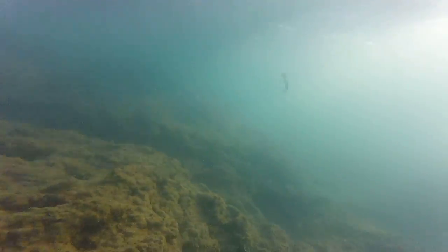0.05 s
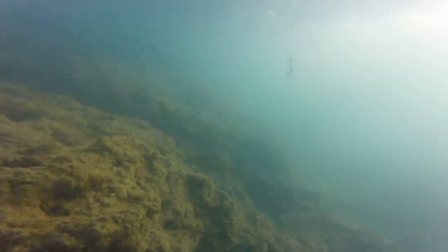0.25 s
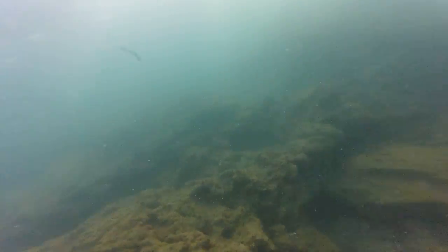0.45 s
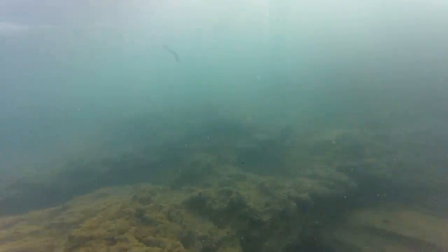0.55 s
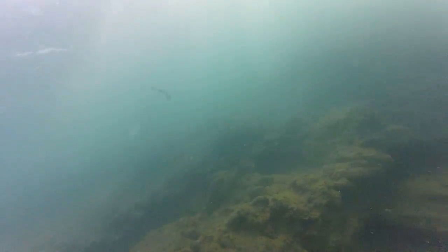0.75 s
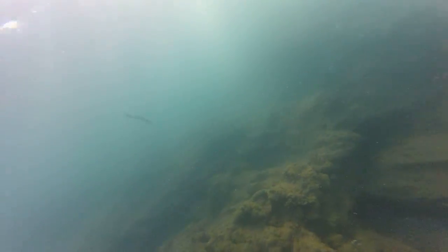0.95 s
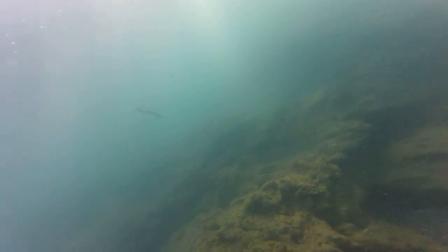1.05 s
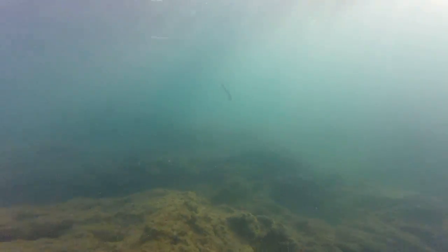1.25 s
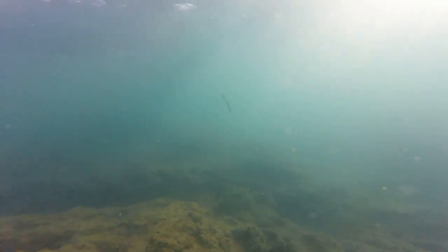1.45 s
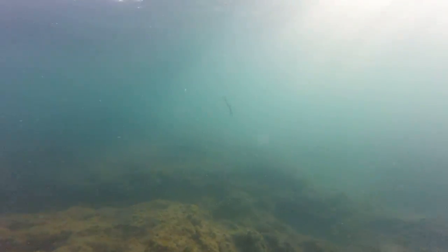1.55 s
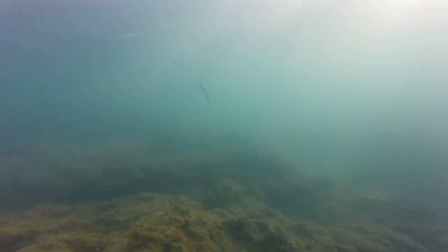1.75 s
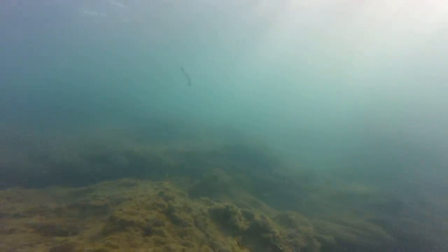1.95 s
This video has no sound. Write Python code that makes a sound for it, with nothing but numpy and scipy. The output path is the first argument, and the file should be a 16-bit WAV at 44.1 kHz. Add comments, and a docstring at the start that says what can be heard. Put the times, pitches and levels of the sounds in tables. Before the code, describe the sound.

Muffled water sways and churns, heard from inside a waterproof camera case near a rocky seabed. The case is knocked and scraped loudly, then bumped more softly and rubbed once, while faint snaps click over a dull hiss.

```python
"""Water hisses dully, sways and churns against a waterproof camera case carried over shallow rocks.
Tiny sharp snaps sound throughout. The case is bumped and scraped in one loud cluster, then more
gently: hard contacts crack and ring its wall modes, soft blows thump the shell.
Water swishes past three times; a grip rubs the case once, in uneven slips."""
import sys
import numpy as np
from scipy import signal
from scipy.fft import rfft, irfft, next_fast_len
from scipy.io import wavfile
from scipy.ndimage import map_coordinates

SR = 44100
rng = np.random.default_rng(int(sys.argv[2]) if len(sys.argv) > 2 else 0)


def master(y):
    """Save y as 16-bit WAV."""
    cut = np.clip(np.atleast_2d(y).T, -1, 1)
    pcm = np.round(cut * 32767)  # scale
    wavfile.write(sys.argv[1], SR, pcm.astype(np.int16))


N = 88200

# Hiss envelope, dipping after the loud bump (time [s], level [dB])
HISS_ENVELOPE = [(0, -47.5), (.38, -49), (.45, -54), (.62, -56.5), (.8, -50.5), (1.05, -50.5),
                 (1.35, -48.5), (2, -50)]
# Hiss spectrum (frequency [Hz], relative level [dB])
HISS_SPECTRUM = [(100, 6.5), (400, -2), (700, -7), (1030, 3.5), (1280, -4.5), (1650, -1.5), (2200, -2.5),
                 (3150, 0), (3650, -11.5), (4200, -5.5), (4800, -20), (6300, -22.5), (8200, -21),
                 (10000, -31), (12500, -32), (14000, -49), (16000, -61)]
# Slow water motion (frequency [Hz], relative level [dB])
SWAY_SPECTRUM = [(8, -33.5), (18, 1), (27, -1.5), (34, 1), (50, -26.5), (90, -25.5), (200, -74),
                 (1000, -140)]
# Turbulence along the case (time [s], relative level [dB])
CHURN_ENVELOPE = [(0, -38.5), (.13, -52.5), (.165, -38), (.24, -53.5), (.35, -51), (.39, -28.5), (.42, -15),
                  (.47, -18), (.51, -26.5), (.55, -15.5), (.58, -40.5), (.66, -41.5), (.73, -41),
                  (.83, -19), (.9, -38), (.98, -43.5), (1.06, -33), (1.12, -32.5), (1.27, -35),
                  (1.34, -45.5), (1.45, -37), (1.56, -43.5), (1.63, -53), (1.88, -60), (2, -53)]
# Turbulence spectrum (frequency [Hz], relative level [dB])
CHURN_SPECTRUM = [(25, 1.5), (55, 2.5), (105, 5.5), (160, -7.5), (280, -10), (420, -13.5), (600, -24.5),
                  (900, -33), (2000, -71), (6000, -120)]
# Near snaps (time [s], relative treble level [dB], relative body level [dB])
NEAR_SNAPS = [(.2678, -48.5, -61), (.362, -61, -39.5), (.404, -38, -43), (.4095, -21, -40),
              (.4245, -43, -51), (.4309, -41, -29.5), (.4365, -43, -49), (.45, -39.5, -29),
              (.4715, -41, -25), (.481, -32, -48), (.4873, -32, -47), (.5445, -30, -26.5),
              (.5495, -30.5, -45), (.6674, -47.5, -45), (.7866, -43, -41), (.828, -41.5, -41),
              (.855, -45, -38), (.9048, -42.5, -39), (.9472, -47, -41.5), (1.1568, -48.5, -46),
              (1.2735, -52, -35), (1.2974, -39.5, -27), (1.3508, -51, -49), (1.433, -66, -40),
              (1.497, -57, -42.5), (1.5868, -60, -37.5), (1.5995, -39.5, -49), (1.722, -62, -47),
              (1.7389, -52, -39), (1.8921, -47, -49.5), (1.9106, -55, -39)]
# Snap treble (frequency [Hz], relative level [dB])
SNAP_TREBLE_SPECTRUM = [(500, -66), (3000, 1), (5400, -2.5), (6300, 2.5), (7300, -9.5), (8100, 0),
                        (8700, -12.5), (9300, -5.5), (10000, -14), (11700, -22.5), (14000, -28),
                        (16000, -43)]
# Snap body (frequency [Hz], relative level [dB])
SNAP_BODY_SPECTRUM = [(200, -56), (900, -51), (1500, -12), (1950, 3.5), (2600, -3), (3300, -1), (4200, -13),
                      (5200, -34), (9000, -56), (15000, -81)]
# Deep ringing after each shove (time [s], level [dB], pitch [Hz], T60 [s])
SHOVE_RINGS = [(.052, -21, 25.6, 0.55), (.219, -14, 28, 0.34), (.345, -14.5, 27.8, 0.52),
               (.406, -1, 34.1, 0.27), (.781, -17, 32.8, 0.22), (.868, -8, 22.27, 0.52),
               (1.257, -9.5, 24.6, 0.23), (1.427, -12.5, 25.3, 0.55)]
# Soft blows on the shell, plus the low tone under the grip rub at 1.017 s (time [s], level [dB], pitch [Hz],
# T60 [s])
SHELL_THUMPS = [(.196, -24, 159, 0.076), (.4025, -4, 101, 0.013), (.438, -6.5, 198, 0.041),
                (.449, -9.5, 333, 0.049), (.458, -9.5, 284, 0.018), (.469, -7.5, 369, 0.031),
                (.479, -14, 278, 0.085), (.5435, 2, 292, 0.025), (.676, -37, 550, 0.02),
                (.803, -23, 405, 0.059), (.816, -16.5, 104, 0.089), (.855, -27.5, 306, 0.056),
                (1.017, -21.5, 176.6, 0.13), (1.183, -29, 197, 0.053), (1.23, -21.5, 173, 0.066),
                (1.497, -30, 418, .035)]
# Hard contacts, relative levels (time [s], low modes [dB], high modes [dB], crack [dB])
CONTACTS = [(.4027, -8, -44, -24), (0.4061, -4.5, -29, -26), (0.416, -38, -32, -35), (0.421, -44, -43, -43),
            (0.4312, -28, -36, -36), (0.443, -31, -21, -33), (0.4469, -25, -20.5, -29),
            (0.4552, -22, -14, -24), (0.4699, -23, -4, -16.5), (0.476, -23, -22, -39),
            (0.484, -29, -26, -24.5), (.487, -20, -41, -23.5), (.4983, -18, -33, -24),
            (0.5118, -23, -30, -25), (.521, -20.5, -21.5, -30), (.5275, -21.5, -39, -40),
            (.533, -22, -41, -31), (0.5402, -24, -13.5, -17), (.5455, -19.5, -29, -29),
            (0.5511, -25, -33, -41), (.557, -27, -35.5, -46), (0.755, -36, -41.5, -39),
            (0.803, -35, -43, -56), (.8155, -32.5, -41, -48), (.821, -27.5, -50, -42),
            (.831, -26, -54, -49), (.854, -29.5, -47, -33), (.8745, -37.5, -58, -43.5)]
# Lower wall modes (frequency [Hz], relative level [dB])
LOW_WALL_MODES = [(1000, 0), (1150, -9)]
# Upper wall modes (frequency [Hz], relative level [dB])
HIGH_WALL_MODES = [(1620, -1.5), (1800, -14.5)]
# Contact crack (frequency [Hz], relative level [dB])
CRACK_SPECTRUM = [(100, 8), (600, 0), (1200, 5.5), (1900, 0), (2400, -1.5), (2700, -4), (3050, 0.5),
                  (3500, -24), (4000, -9), (4700, -33), (8000, -42), (15000, -59)]
# Water brushing past (centre time [s], 1/e half-width [s], level [dB])
SWISH_PASSES = [(0.462, 0.046, -32), (0.919, 0.041, -46.5), (1.258, .034, -41.5)]
# Swish spectrum (frequency [Hz], relative level [dB])
SWISH_SPECTRUM = [(300, -25), (700, -29), (1000, 7.5), (1250, -3), (1650, 7.5), (2300, -4), (3200, -9.5),
                  (4500, -29), (9000, -38), (15000, -79)]
# Shell response to a grip slip (frequency [Hz], relative gain [dB])
SHELL_RESPONSE = [(50, 5), (190, 1), (430, -1), (640, -18), (850, -32), (1080, -7), (1400, -23),
                  (1850, -33.5), (2200, -25), (3000, -44), (6000, -68), (14000, -100)]


def amp(db):
    """Decibels to gain."""
    return 10 ** (np.asarray(db) / 20)


def gain_at(spectrum, hz):
    """Gain from (Hz, dB) points on a log frequency axis."""
    points_hz, points_db = np.transpose(spectrum)
    return amp(np.interp(np.log(hz + 1), np.log(points_hz + 1), points_db))


def curve(points):
    """(s, value) points to one value per sample."""
    return np.interp(np.arange(N) / SR, *np.transpose(points))


def wobble(rate_hz):
    """Smooth random curve through Gaussian knots."""
    knots = rng.standard_normal(int(N * rate_hz / SR) + 4)
    return map_coordinates(knots, [np.arange(N) * rate_hz / SR])


def filtered(x, response):
    """Zero-phase filter with gain response(hz)."""
    size = next_fast_len(N + SR // 2)
    hz = np.fft.rfftfreq(size, 1 / SR)
    return irfft(rfft(x, size) * response(hz), size)[:N]


def noise(spectrum):
    """Coloured noise, rms 1."""
    x = filtered(rng.standard_normal(N), lambda hz: gain_at(spectrum, hz))
    return x / np.sqrt(np.mean(x ** 2) + 1e-20)


def minimum_phase(spectrum, size=4096):
    """Causal impulse response from the folded cepstrum."""
    hz = np.fft.rfftfreq(size, 1 / SR)
    cepstrum = irfft(np.log(gain_at(spectrum, hz)))
    cepstrum[1:size // 2] *= 2
    cepstrum[size // 2 + 1:] = 0
    return irfft(np.exp(rfft(cepstrum)))


def add(track, start_s, sound):
    """Mix in place."""
    part = track[max(round(start_s * SR), 0):][:len(sound)]
    part += sound[:len(part)]


def fade(t60_s, rise_s):
    """Soft rise, exponential decay."""
    t = np.arange(int(1.5 * t60_s * SR) + 2) / SR
    return amp(-60 * t / t60_s) * (1 - np.exp(-(t / rise_s) ** 2))


def bursts(hits, spectrum, t60_s, rise_s):
    """One decaying noise burst per (s, dB)."""
    envelope = np.zeros(N)
    for start_s, db in hits:
        add(envelope, start_s, amp(db) * fade(t60_s, rise_s))
    return envelope * noise(spectrum)


def damped_modes(blows, rise_s):
    """One decaying sine per blow."""
    out = np.zeros(N)
    for start_s, db, hz, t60_s in blows:
        envelope = amp(db) * fade(t60_s, rise_s)
        t = np.arange(len(envelope)) / SR
        add(out, start_s, envelope * np.sin(2 * np.pi * hz * t))
    return out


def hiss(flutter_db=0.8):
    """Dull, nearly steady underwater noise."""
    level_db = curve(HISS_ENVELOPE) + flutter_db * wobble(rate_hz=29.1)
    return amp(level_db) * noise(HISS_SPECTRUM)


def sway(level_db=-32):
    """Slow water motion rumbles against the shell."""
    return amp(level_db) * noise(SWAY_SPECTRUM)


def churn(gain_db=-2, flutter_db=4):
    """Turbulence along the case: low, surging noise."""
    level_db = curve(CHURN_ENVELOPE) + gain_db + flutter_db * wobble(rate_hz=60.48)
    return amp(level_db) * noise(CHURN_SPECTRUM)


def snaps(gain_db=5.5, rise_s=0.00067, far_per_s=50, far_floor_db=-61.5, far_spread_db=1.5):
    """Sharp clicks, some near, many far and faint: short treble over a longer body."""
    events = list(NEAR_SNAPS)
    for position, chance in rng.random((int(far_per_s * N / SR), 2)):
        far_db = far_floor_db - far_spread_db * np.log(chance)
        events.append((position * N / SR, far_db, far_db + 7.5))  # body above treble
    treble_hits = [(start_s, db) for start_s, db, _ in events]
    body_hits = [(start_s, db) for start_s, _, db in events]
    treble = bursts(treble_hits, SNAP_TREBLE_SPECTRUM, t60_s=0.0095, rise_s=rise_s)
    body = bursts(body_hits, SNAP_BODY_SPECTRUM, t60_s=0.018, rise_s=rise_s)
    return amp(gain_db) * (treble + body)


def shoves():
    """Each shove sets off a deep, damped ringing near 27 Hz."""
    return damped_modes(SHOVE_RINGS, rise_s=0.0027)


def thumps():
    """Soft blows each ring one heavily damped shell mode; one row gives the grip rub its low tone."""
    return damped_modes(SHELL_THUMPS, rise_s=0.00068)


def knocks(rise_s=0.0037, tail_db=-13.5, ring_gain_db=0.5, crack_gain_db=9, detune=0.015):
    """Each contact cracks and swells two groups of wall modes; water damps them to a weak tail."""
    tail = amp(tail_db) * fade(t60_s=0.047, rise_s=rise_s)
    t = np.arange(len(tail)) / SR
    swell = np.sin(np.pi * np.minimum(t / (2 * rise_s), 1)) ** 2
    envelope = amp(ring_gain_db) * (swell + tail)
    walls = np.zeros(N)
    for start_s, low_db, high_db, _ in CONTACTS:
        for modes, group_db in ((LOW_WALL_MODES, low_db), (HIGH_WALL_MODES, high_db)):
            for hz, mode_db in modes:
                detuned_hz = hz * (1 + detune * rng.normal())
                tone = np.sin(2 * np.pi * detuned_hz * t)
                add(walls, start_s, amp(group_db + mode_db) * envelope * tone)
    crack_hits = [(start_s, db + crack_gain_db) for start_s, _, _, db in CONTACTS]
    return walls + bursts(crack_hits, CRACK_SPECTRUM, t60_s=0.019, rise_s=0.0017)


def swishes(flutter_db=2.5):
    """Water brushes past in brief swells of midrange noise."""
    flow = sum(amp(db) * np.exp(-((np.arange(N) / SR - centre_s) / half_width_s) ** 2)
               for centre_s, half_width_s, db in SWISH_PASSES)
    flutter = amp(flutter_db * wobble(rate_hz=250))
    return flow * flutter * noise(SWISH_SPECTRUM)


def grip_rub(start_s=1.007, length_s=0.046, level_db=-27.5, start_hz=271.6, slowing=0.4, jitter=0.22):
    """Uneven slips swell, slow and die; each one pushes the shell."""
    progress = np.linspace(0, 1, int(length_s * SR))
    unevenness = 1 + jitter * wobble(rate_hz=200)[:len(progress)]
    slip_hz = start_hz * (1 - slowing * progress) * unevenness
    slip_count = np.floor(np.cumsum(slip_hz) / SR)
    slips = np.diff(slip_count, prepend=0) * np.sin(np.pi * progress)
    shell = signal.fftconvolve(slips, minimum_phase(SHELL_RESPONSE))
    out = np.zeros(N)
    add(out, start_s, amp(level_db) * shell / np.std(shell[:len(progress)]))
    return out


def scene():
    """All sources reach one microphone through the shell."""
    water = sway() + churn() + swishes() + hiss()
    handling = thumps() + knocks() + grip_rub()
    return (water + shoves() + handling + snaps())[None]


def record(dry, ceiling=0.9, low_cut_hz=12, top_hz=15800):
    """Soft peak limiting, then band limiting."""
    limited = dry[0] / (1 + np.abs(dry[0] / ceiling) ** 8) ** (1 / 8)
    return filtered(limited, lambda hz: (hz < top_hz) * hz ** 2 / (hz ** 2 + low_cut_hz ** 2))[None]


dry = scene()
out = record(dry)
master(out)
```